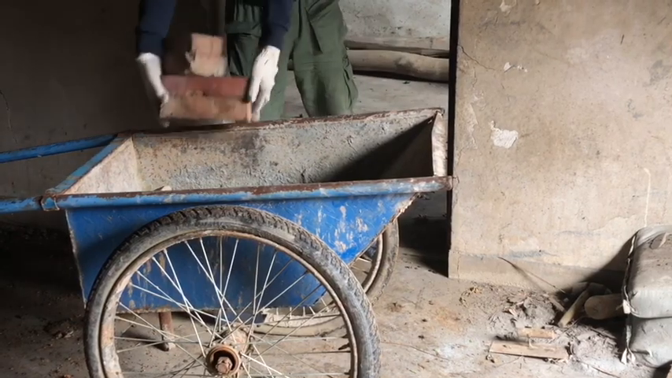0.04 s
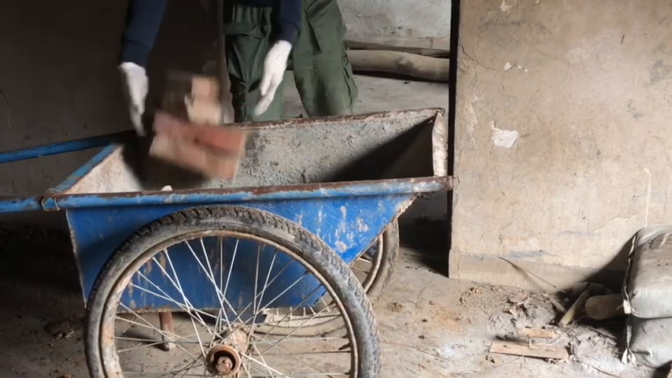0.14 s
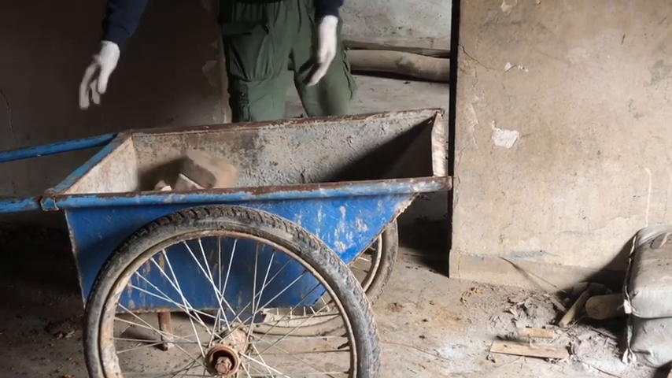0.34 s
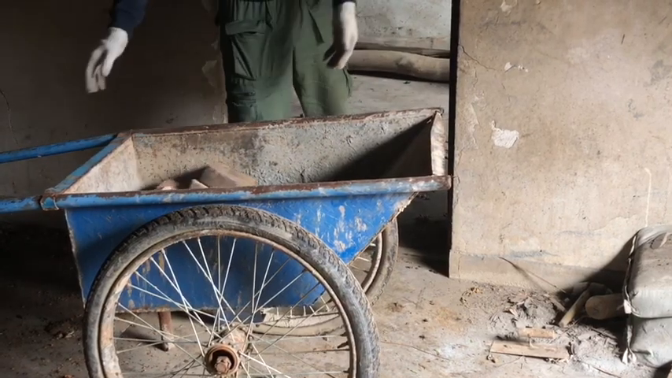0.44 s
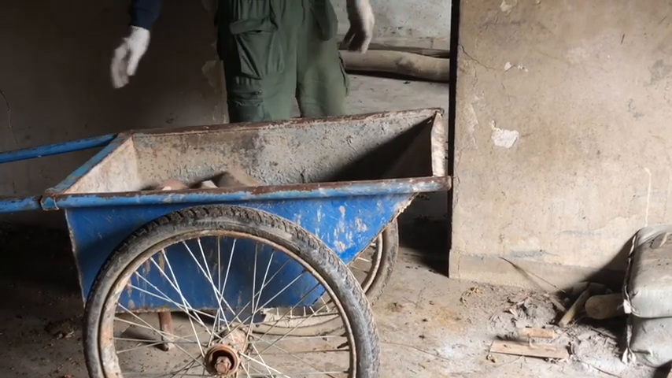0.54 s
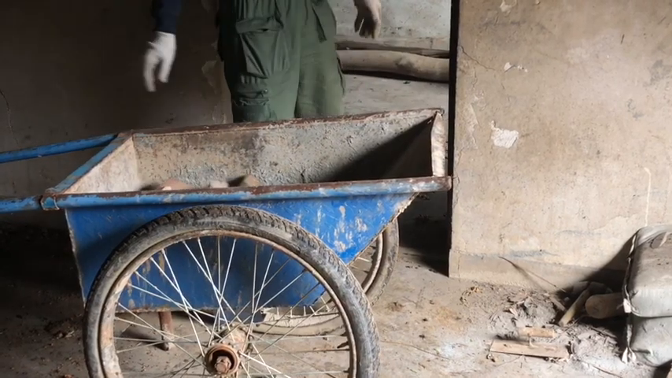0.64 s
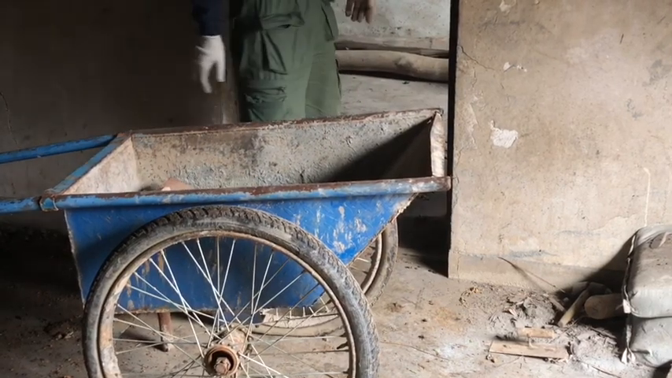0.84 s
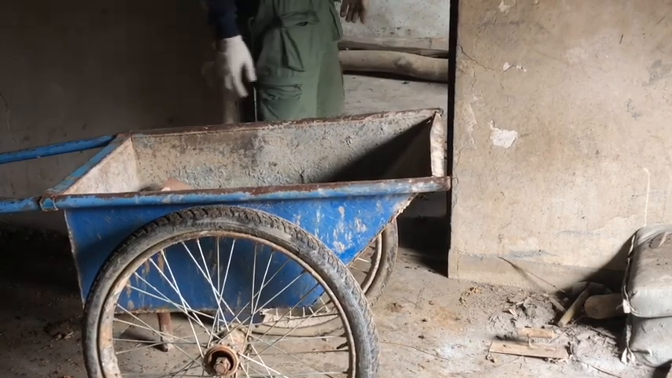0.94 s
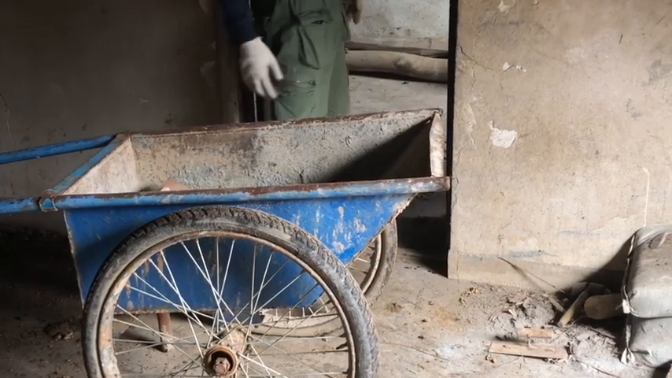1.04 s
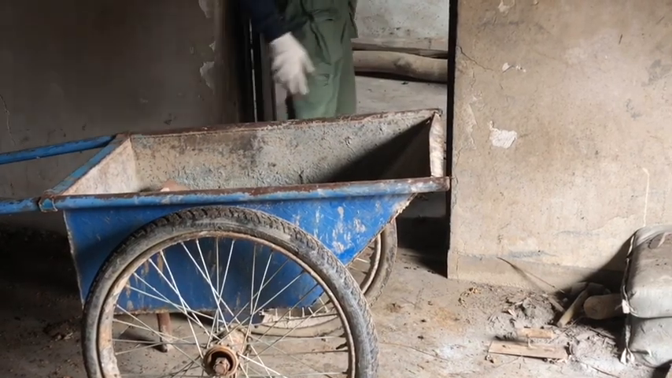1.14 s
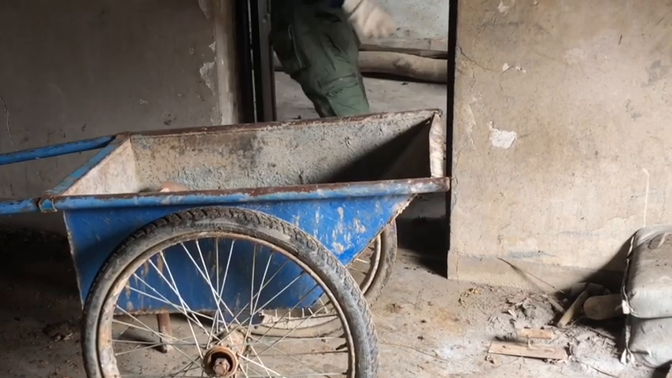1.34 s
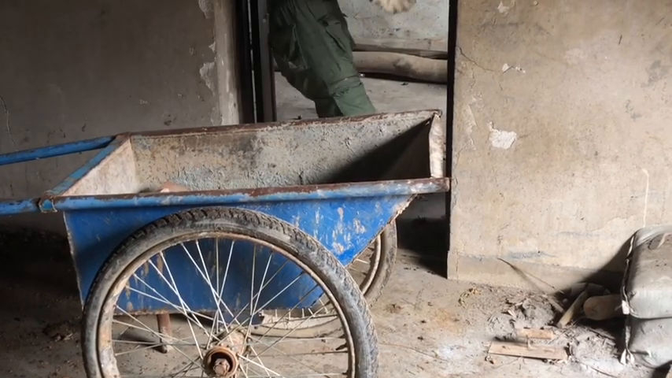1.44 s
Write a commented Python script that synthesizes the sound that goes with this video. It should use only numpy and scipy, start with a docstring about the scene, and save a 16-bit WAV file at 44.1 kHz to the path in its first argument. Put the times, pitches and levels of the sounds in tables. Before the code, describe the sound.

Near-quiet with faint low rumble and hiss until about 0.2 s, when bricks slam into a steel cart: a dense, slightly squashed burst of booms, clangs, gritty cracks and high brick clinks until 0.33 s. Small chips and light knocks follow at 0.45-0.6 s, then a brick topples with a quick triple knock near 0.74 s. Hollow ringing fades in the bare room; a faint shoe scuff at 1.2-1.35 s.

```python
"""Old bricks, an armful, land in a steel hand cart in a bare room, loud enough to work the limiter. The tub
booms and clangs as sine modes and decaying bands of noise; the bricks clink as unsteady tones. Contacts crack
and shed grit as short noise bursts that the bare walls answer; one brick topples on the side. Afterwards a shoe
scuffs on the dusty floor, as swelling noise, over the building's low rumble and a faint hiss that fades, swells
a little and fades again."""
import sys
import numpy as np
from scipy import signal
from scipy.fft import rfft, irfft
from scipy.io import wavfile

SR = 44100
rng = np.random.default_rng(int(sys.argv[2]) if len(sys.argv) > 2 else 0)


def wav_out(sig):
    """Save sig, one row per channel (or a flat mono array), as 16-bit PCM at SR to the path in sys.argv[1]."""
    wavfile.write(sys.argv[1], SR, np.round(np.clip(np.atleast_2d(sig).T, -1, 1) * 32767).astype(np.int16))


N = 63945
TIME = np.arange(N) / SR


def from_db(db):
    """Decibels to amplitude gain."""
    return 10 ** (np.asarray(db) / 20)


def rms_one(x):
    """Scale to unit rms."""
    return x / np.sqrt(np.mean(x ** 2) + 1e-20)


def at_hz(points, hz):
    """Read a table on a log-frequency axis."""
    f, value = np.transpose(points)
    return np.interp(np.log(np.maximum(hz, 1)), np.log(f), value)


def swell(rows):
    """Gain over time from a level curve."""
    return from_db(np.interp(TIME, *np.transpose(rows)))


def coloured(x, spectrum):
    """Give a noise a spectrum; unit rms over the whole length."""
    bins_hz = np.arange(N // 2 + 1) * SR / N
    return rms_one(irfft(rfft(x) * from_db(at_hz(spectrum, bins_hz)), N))


def drift(rate):
    """Slow chance: random points of spread one, `rate` per second, joined by lines."""
    return np.interp(TIME * rate, np.arange(N), rng.standard_normal(N))


def grains(spread_db):
    """Dense noise whose grains are of uneven size."""
    return rng.standard_normal(N) * from_db(spread_db * drift(2500))


def struck(s, rise_s, t60):
    """Envelope that builds up from time s and dies away, by 60 dB in t60 seconds."""
    age = np.maximum(TIME - s, 0)
    return (1 - np.exp(-age / rise_s)) * np.exp(-np.log(1000) * age / t60)


# rumble of the building, relative spectrum: [f/Hz, level/dB per Hz]
RUMBLE_SPECTRUM = [(25, -15.5), (70, -6.5), (125, -2), (200, -8), (500, -16.5), (1500, -15.5),
                   (8000, -44.5)]
# faint hiss over time, fading at first, then swelling a little and dying away: [t/s, level/dB]
HISS_LEVEL = [(0, -58), (.08, -60), (.16, -63.5), (.7, -59.5), (1.45, -72)]
# its relative spectrum: [f/Hz, level/dB per Hz]
HISS_SPECTRUM = [(100, -8), (800, 6), (2000, 0), (5000, -4.5), (10000, -8.5), (15000, -14)]
RUMBLE_DB = -66


def background():
    """Low rumble of the building and a faint hiss: two noises, the rumble steady, the hiss changing level."""
    low, high = rng.standard_normal((2, N))
    rumble = from_db(RUMBLE_DB) * coloured(low, RUMBLE_SPECTRUM)
    return rumble + swell(HISS_LEVEL) * coloured(high, HISS_SPECTRUM)


SETTLE_S, SETTLE_RAMP_S, SETTLE_LOSS_DB = 0.34, .07, 2


def damping(s):
    """Gain over time for a blow at s: the pile comes to rest and takes away some of what rang before."""
    settled = np.clip((TIME - SETTLE_S) / SETTLE_RAMP_S, 0, 1)
    return from_db(-SETTLE_LOSS_DB * (s < SETTLE_S) * settled)


# bricks hit the tub: [t/s, knock level/dB (not played), clang level/dB, boom level/dB, crack level/dB,
# hardness f/Hz, place from 0 floor to 1 side wall]; boom and cracks below play it too
BRICK_BLOWS = [(0.193, -38, -31.5, -46, -44, 910, 0.97), (0.2029, 6, -6, -22, -12, 2630, 0.25),
               (0.2105, -3, -19, -4.5, -19.5, 2780, 0.51), (0.2306, -22.5, -8.5, -12, -11.5, 3466, 1),
               (0.249, -4, -13.5, -5.5, -45, 2000, 0.33), (0.288, -14, -15.5, -20, -40.5, 2000, 0),
               (0.2985, 8, -20.5, -7.5, -43, 1697, 0.067), (0.3235, -13.5, -17.5, -9.5, -30.5, 1300, 0.039),
               (0.472, -46, -31, -32.5, -40, 89.3, 0), (0.551, -8, -38, -48, -32.5, 2560, 1),
               (0.592, -32, -28, -27, -36, 556, 1), (0.731, -21, -21.5, -27.5, -40, 1390, 1),
               (0.744, -17, -25, -28, -30.5, 1230, 1), (0.758, -16, -28.5, -17, -37, 970, 0.92),
               (0.978, -44, -56, -41, -75, 207, 0.72), (1.116, -49, -61, -59, -48.5, 890, 0.74)]
# dense ringing of tub and room, relative spectrum: [f/Hz, level/dB per Hz]
CLANG_SPECTRUM = [(30, -35), (60, -9.5), (90, -2.5), (125, 2), (170, 3.5), (230, -1.5), (330, 2),
                  (600, -0.5), (950, -1.5), (1500, -8), (2500, -13.5), (3500, -18), (7000, -31.5),
                  (15000, -31.5)]
# how long that ringing lasts: [f/Hz, t60/s]
CLANG_DECAY = [(50, 1.0), (130, 1), (300, 0.73), (600, 0.5), (1200, 0.41), (3000, 0.46), (8000, 0.29),
               (15000, 0.19)]
CLANG_BLOOM_CYCLES, CLANG_BLOOM_MAX_S = 3.0, .02
BASS_TAIL_DB, BASS_TAIL_T60_S, BASS_TAIL_HZ = -7, 1.78, 191
BASS_CUT_SHARE = 0.11  # a hard blow is too brief to drive the tub below this share of its hardness


def clang():
    """Countless tub and room modes as noise bands: lows bloom later and linger, soft blows are duller."""
    edges = np.geomspace(28, 17000, 25)
    centres = np.sqrt(edges[1:] * edges[:-1])
    gains = from_db(at_hz(CLANG_SPECTRUM, centres)) * np.sqrt(np.diff(edges))
    gains = gains / np.linalg.norm(gains)
    white = rng.standard_normal((2, N + SR // 2))  # the extra half second lets the filters settle
    out = 0
    for k, hz in enumerate(centres):
        band_filter = signal.butter(3, edges[k:k + 2], "band", fs=SR, output="sos")
        band = signal.sosfilt(band_filter, white[k % 2])[-N:]  # neighbours use separate noises
        bloom_s = min(CLANG_BLOOM_CYCLES / hz, CLANG_BLOOM_MAX_S)
        tail_gain = from_db(BASS_TAIL_DB) / (1 + (hz / BASS_TAIL_HZ) ** 2)
        tail = tail_gain * struck(0, bloom_s, BASS_TAIL_T60_S)
        power_shape = struck(0, bloom_s, at_hz(CLANG_DECAY, hz)) ** 2 + tail ** 2
        power = np.zeros(N)
        for s, _, db, _, _, hard_hz, _ in BRICK_BLOWS:
            start = int(s * SR)
            rolloff = 1 + (hz / hard_hz) ** 2 + (BASS_CUT_SHARE * hard_hz / hz) ** 2
            ringing = power_shape[:N - start] * damping(s)[start:] ** 2
            power[start:] += from_db(db) ** 2 / rolloff * ringing
        out = out + gains[k] * rms_one(band) * np.sqrt(power)
    return out


def built_up(levels_db, shape):
    """Envelope of a ringing part: the energies of all blows add."""
    power = np.zeros(N)
    for blow, db in zip(BRICK_BLOWS, levels_db):
        start = int(blow[0] * SR)
        power[start:] += (from_db(db) * shape[:N - start] * damping(blow[0])[start:]) ** 2
    return np.sqrt(power)


# panel modes of the tub, levels relative to the blow's boom:
# [f/Hz, level/dB struck on the floor, level/dB struck on the side wall, t60/s]
PANEL_MODES = [(121.97, -28.5, -18.5, 1.5), (142, -13.5, -24.5, 0.98), (158.9, 5, -18.5, 0.33),
               (184.4, -22, -4, 0.45), (211.1, -30, -16.5, 1.16), (301.2, -9, -2.5, 0.35),
               (334.1, -15, -11, 0.47), (362.9, -18.5, -4, 0.44), (463.5, -11, -5, 0.19),
               (544, -17.5, -26, 0.19), (570, -35.5, -17.5, 0.92), (617.5, -14, -21.5, 0.16),
               (676.4, -14.5, -17, 0.36), (749, -20, -10.5, 0.16), (887.3, -18, -16, .4),
               (932.3, -14.5, -12.5, 0.13), (1034, -22, -19.5, 0.3), (1200.5, -26.5, -29.5, 0.45),
               (1650, -23, -31, 0.1)]
MODE_BLOOM_CYCLES, MODE_WAVER_DB = 0.83, 2


def boom():
    """The strong panel modes as wavering sines; where a brick lands decides which of them speak."""
    boom_db, place = np.array(BRICK_BLOWS)[:, 3], np.array(BRICK_BLOWS)[:, 6]
    out = 0
    for hz, floor_db, wall_db, t60 in PANEL_MODES:
        mode_db = floor_db + place * (wall_db - floor_db)
        level = built_up(boom_db + mode_db, struck(0, MODE_BLOOM_CYCLES / hz, t60))
        waver = from_db(MODE_WAVER_DB * drift(40))
        tone = np.sin(2 * np.pi * (hz * TIME + rng.random()))
        out = out + level * waver * tone
    return out


# brick edges chip on each other: [t/s, level/dB]
EDGE_CHIPS = [(0.450, -38), (0.466, -35.5), (0.492, -38), (0.727, -27.5), (0.827, -40.5), (0.848, -46),
              (0.8995, -41.5), (0.9995, -54.5)]
# crushed grit at a contact, relative spectrum: [f/Hz, level/dB per Hz]
CRACK_SPECTRUM = [(100, -18.5), (600, 11), (1500, 4.5), (3000, 5), (5000, 2), (7000, -4), (10000, -4),
                  (15500, -16.5)]
CRACK_S, CRACK_GRAIN_DB = 0.0064, 2.5  # decay time constant, unevenness
CRACK_ROOM_DB, CRACK_ROOM_T60_S = -4, 0.37


def cracks():
    """Every contact crushes grit for a few milliseconds; the bare walls answer with a noise tail."""
    contacts = [(row[0], row[4]) for row in BRICK_BLOWS] + list(EDGE_CHIPS)
    force = sum(from_db(db) * struck(s, 0.0022, CRACK_S * np.log(1000)) for s, db in contacts)
    direct = force * coloured(grains(CRACK_GRAIN_DB), CRACK_SPECTRUM)
    walls = rng.standard_normal(N) * struck(0.001, 0.0023, CRACK_ROOM_T60_S)
    answer = signal.fftconvolve(direct, walls / np.linalg.norm(walls))[:N]
    return direct + from_db(CRACK_ROOM_DB) * answer


# a brick rings: [t/s, pitch f/Hz, level/dB]
BRICK_CLINKS = [(0.212, 2403, -15), (0.222, 2330, -17), (0.234, 2690, -19.5), (0.275, 2412, -22),
                (0.291, 2472, -24.5), (0.325, 2390, -27), (0.52, 3015, -50), (0.653, 3000, -51),
                (1.119, 2420, -51)]
CLINK_T60_S, CLINK_RISE_S, OVERTONE_RATIO, OVERTONE_DB = 0.29, 0.0047, 2.4, -22


def clinks():
    """Each knocked brick rings on one unsteady note with a weak overtone."""
    out = 0
    for s, hz, db in BRICK_CLINKS:
        phase = 2 * np.pi * hz * (TIME - s) + .5 * drift(100)
        tone = np.sin(phase) + from_db(OVERTONE_DB) * np.sin(OVERTONE_RATIO * phase)
        unsteady = from_db(db + 0.76 * drift(120))
        out = out + unsteady * struck(s, CLINK_RISE_S, CLINK_T60_S) * tone
    return out


# the shoe's scuff over time: [t/s, level/dB]
SCUFF_LEVEL = [(1.19, -107.5), (1.225, -55.5), (1.265, -50), (1.3, -50), (1.33, -55), (1.38, -63.5),
               (1.45, -67.5)]
# its relative spectrum: [f/Hz, level/dB per Hz]
SCUFF_SPECTRUM = [(200, -12), (700, -6.5), (1150, 4), (2000, -4), (4000, -1.5), (6000, -8), (10000, -11.5),
                  (15000, -16)]


def scuff():
    """A sole drags over dust and sand: coloured noise with a slightly uneven level."""
    drag = swell(SCUFF_LEVEL) * from_db(0.89 * drift(140))
    return drag * coloured(grains(0), SCUFF_SPECTRUM)  # 0 dB spread: even grains


def scene():
    """Everything at one microphone beside the cart."""
    return (clang() + boom() + clinks() + cracks() + scuff() + background())[None]


THRESHOLD_DB, ATTACK_S, RECOVER_DB_PER_S = -0.5, 0.0069, 90
TOP, CUTOFF_HZ = .95, 15800  # rounding ceiling (full scale 1), top of the treble


def record(dry):
    """A limiter closes on the crash; its slow attack lets peaks by to be rounded off; the top is cut."""
    over = np.maximum(20 * np.log10(np.abs(dry[0]) + 1e-9) - THRESHOLD_DB, 0)
    # hold the largest excess while it falls at the recovery rate
    recovery = RECOVER_DB_PER_S * TIME
    held = np.maximum.accumulate(over + recovery) - recovery
    keep = np.exp(-1 / (ATTACK_S * SR))
    reduction_db = signal.lfilter([1 - keep], [1, -keep], held)
    limited = dry * from_db(-reduction_db)
    rounded = limited / (1 + (limited / TOP) ** 6) ** (1 / 6)
    return signal.sosfilt(signal.ellip(10, .2, 80, CUTOFF_HZ, fs=SR, output="sos"), rounded)


dry = scene()
out = record(dry)
wav_out(out)
```